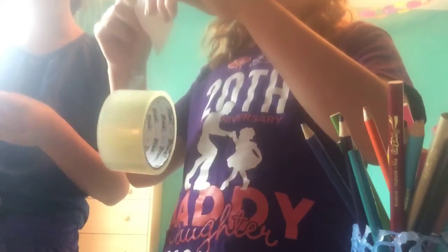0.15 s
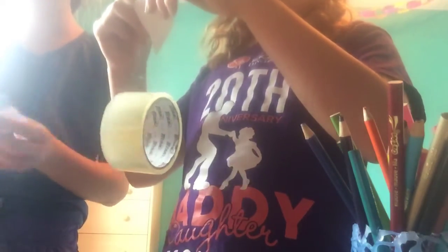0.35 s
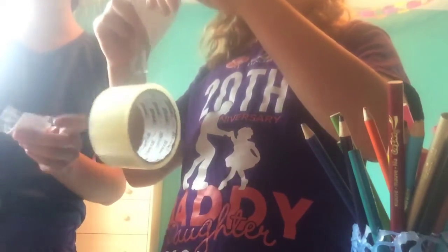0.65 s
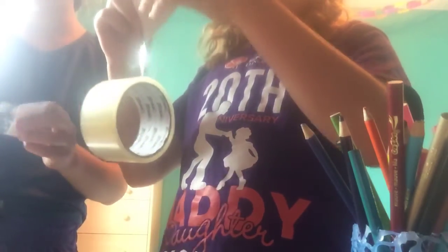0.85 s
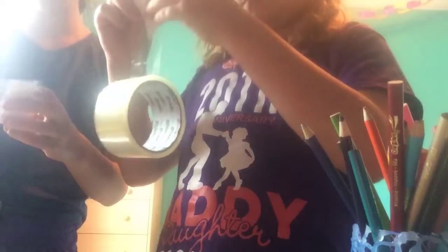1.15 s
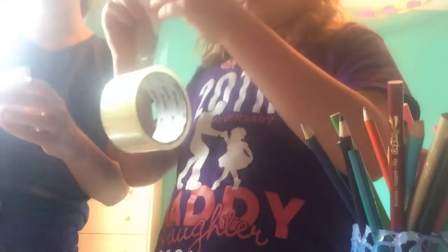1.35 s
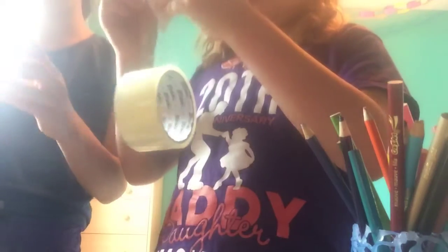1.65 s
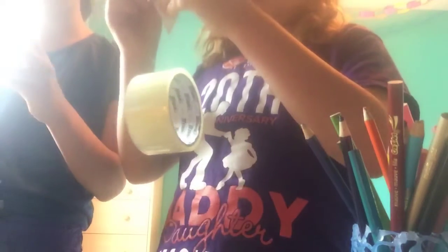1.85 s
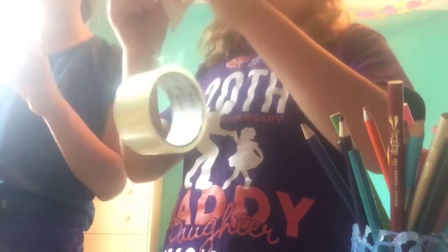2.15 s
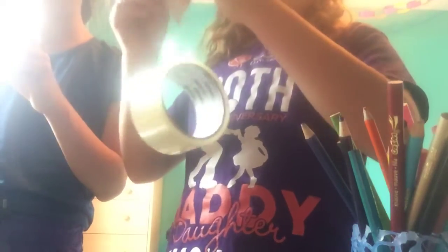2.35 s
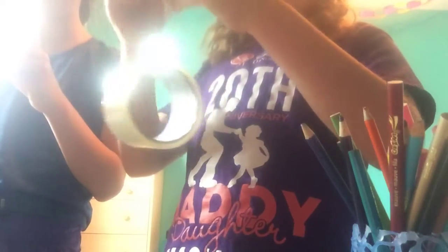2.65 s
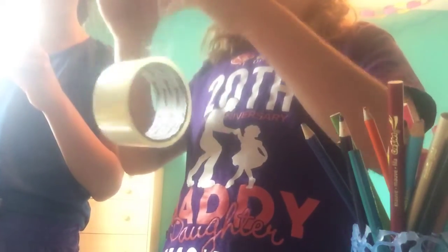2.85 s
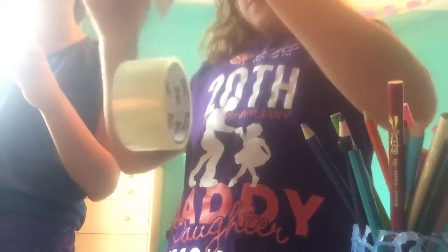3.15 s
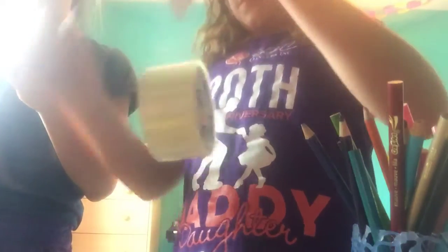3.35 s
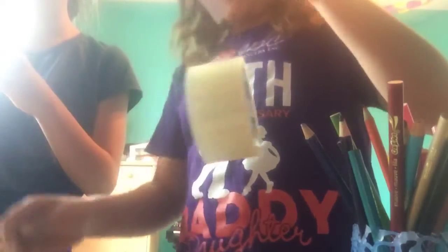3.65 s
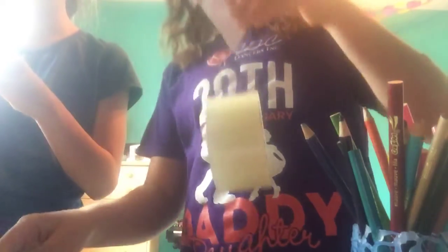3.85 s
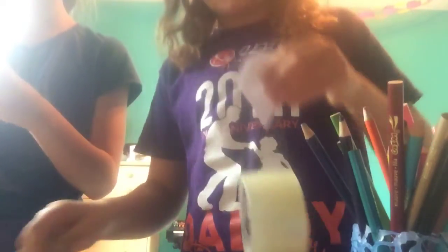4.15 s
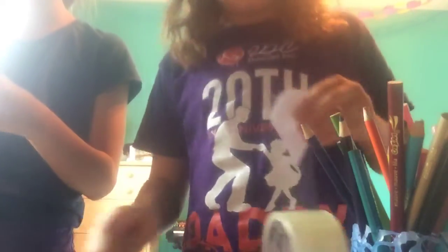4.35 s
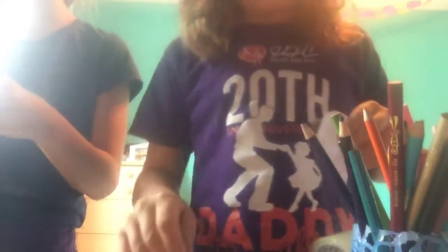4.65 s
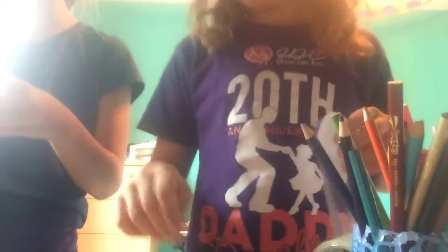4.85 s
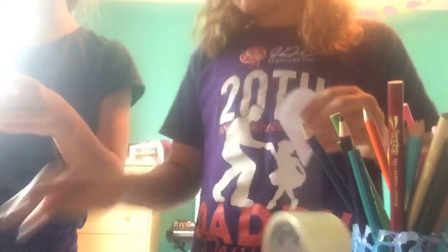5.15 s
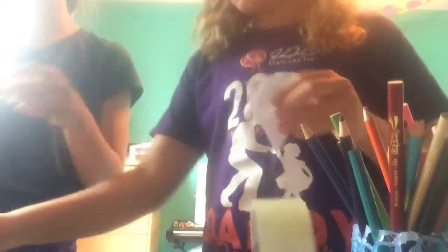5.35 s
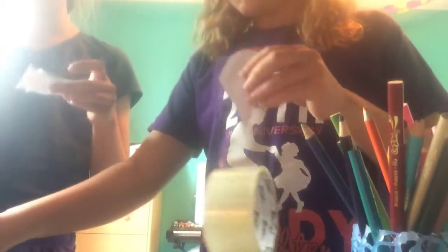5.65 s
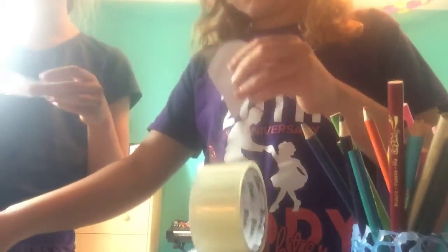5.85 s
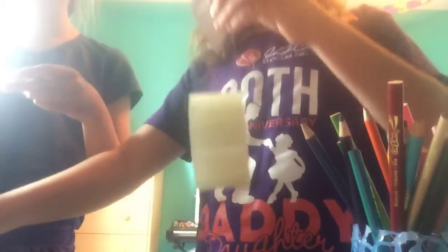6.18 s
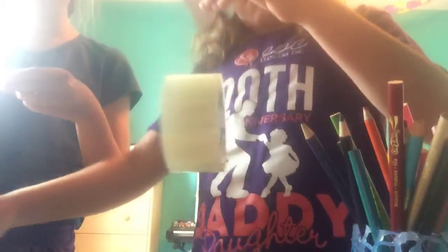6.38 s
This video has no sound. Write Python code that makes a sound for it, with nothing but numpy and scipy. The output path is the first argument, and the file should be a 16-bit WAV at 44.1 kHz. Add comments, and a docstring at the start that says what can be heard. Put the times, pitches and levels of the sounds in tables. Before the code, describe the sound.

Clear packing tape is tugged off its roll in two bouts of short crackling jerks, with rasping, brief squeaks and light finger ticks between.

```python
"""Packing tape, close up

A small room, one microphone close to a roll of clear packing tape tugged off in short jerks.
The glue holds, then lets go: each slip cracks, runs through the taut film and thumps the cardboard core.
Between slips the glue creeps with a rasp, a groan and brief squeaks.
Fingers tick and brush on the film; the room tone, with its low hum, lies underneath."""
import sys
import numpy as np
from scipy import signal
from scipy.fft import rfft, irfft
from scipy.io import wavfile
from scipy.ndimage import uniform_filter1d

SR = 44100
rng = np.random.default_rng(int(sys.argv[2]) if len(sys.argv) > 2 else 0)


def dump_mix(stems):
    """Bounce the given channels to the path in sys.argv[1] as a 16-bit WAV at rate SR."""
    frames = np.atleast_2d(stems).T  # one column per channel
    limited = np.clip(frames, -1, 1)  # hard clip at full scale
    pcm = np.round(limited * 32767).astype(np.int16)
    wavfile.write(sys.argv[1], SR, pcm)


N = 287532
TIME = np.arange(N) / SR
RING_TIME = np.arange(SR // 10) / SR  # time axis of one blow

# spectrum of the room tone: f/Hz, level/dB
ROOM_TONE = [(20, -37), (35, -21), (60, 0), (85, -4), (120, -3), (170, -10), (290, -13), (400, -21),
             (700, -27), (1400, -28), (2500, -37), (5000, -40.5), (13300, -42), (15500, -61)]
# broad colour of the tape: f/Hz, level/dB
TAPE_COLOUR = [(25, -27), (50, -10), (85, -4), (150, -1), (220, -5), (320, -3), (430, -13), (720, -10),
               (1200, -13), (2200, -18), (2600, -25), (4000, -24), (6100, -27), (7100, -41), (9300, -38),
               (11000, -42), (12800, -39.5), (15500, -58)]
# resonances of roll, film and the room around them: f/Hz, width/Hz, lift/dB
TAPE_RESONANCES = [(90, 18, 5), (150, 28, 6), (225, 24, 3), (283, 30, 4), (338, 18, 5), (450, 26, 6),
                   (563, 14, 10), (712, 26, 10), (845, 26, 4), (915, 26, 4), (1060, 28, 3), (1157, 40, 4),
                   (1228, 34, 4), (1390, 24, 6), (1541, 24, 9), (1760, 26, 6), (1848, 24, 5), (2000, 24, 6),
                   (2150, 34, 6), (2270, 34, 6), (2940, 90, 6), (3245, 70, 6), (3390, 50, 5), (3600, 70, 4),
                   (5950, 220, 2), (8400, 700, 5)]
# colour of the loose film: f/Hz, level/dB
FILM_COLOUR = [(300, -8), (1500, 2), (3000, -3), (4400, 3), (5200, 1), (6000, 4), (7200, -12), (9300, -3),
               (10800, -5), (12500, 0), (15500, -10)]
# film gliding over skin: t/s, half length/s, level/dB, treble/dB
FILM_GLIDES = [(2.35, .012, -63, -5), (2.425, .025, -69, -5), (3.1, .05, -77, 5), (3.24, .027, -70.5, 0),
               (3.46, .04, -71, -4), (3.985, .022, -72.5, 1), (4.115, .02, -73, 2), (5.345, .015, -68, -12)]
# film crinkling in the fingers: t/s, half length/s, level/dB, treble/dB
FILM_CRINKLES = [(.835, .012, -58, 12), (1.19, .04, -71, 5), (1.464, .008, -56, 7), (1.81, .014, -63, 6),
                 (4.208, .005, -66, -1)]
# skin sliding on film and roll: t/s, half length/s, centre f/Hz, width/centre, level/dB
SKIN_RUBS = [(1.195, .028, 2940, .45, -53), (1.19, .035, 1200, .12, -47), (1.09, .03, 1230, .03, -52),
             (1.485, .025, 1050, .7, -49), (1.522, .012, 1200, 1.2, -44), (1.6, .03, 1020, .3, -57),
             (2.355, .012, 680, .5, -65), (2.42, .025, 1650, .6, -66), (4.69, .025, 1750, .5, -58),
             (4.74, .05, 1600, .4, -66), (4.69, .05, 230, .5, -60), (5.345, .022, 1400, .4, -62),
             (5.42, .022, 1420, .35, -55), (5.5, .015, 1800, .6, -53), (5.59, .02, 1550, .5, -57),
             (6.045, .02, 1000, 2.5, -54), (6.128, .014, 1600, 2.5, -52)]
# light ticks of fingers and loose film: t/s, strength/dB, brightness/(dB per octave), ring f/Hz,
# relative length
FINGER_TICKS = [(.5104, -56, -5, 1310, 1), (.6584, -67, 3, 5490, 1), (.7337, -77, 11, 4630, 1),
                (2.2714, -59, 0, 3390, 1), (2.3426, -63, 4.5, 4620, 2), (2.3554, -60, 2.1, 1110, 1.5),
                (2.4154, -59, -.5, 1630, 2.5), (2.5476, -92, 14.5, 13300, 1), (2.5955, -81, 11.3, 12200, 1),
                (2.6544, -54, -1.6, 1250, 1.5), (2.7744, -52, -4.5, 1340, 1), (2.8799, -73, 6.5, 4280, 1),
                (3.3049, -61, -.5, 700, 1.8), (3.5204, -62, -5, 1280, 1.8), (3.8906, -70, 5.5, 3740, 2),
                (4.2188, -74, 12.6, 6030, 1.3), (4.3545, -67, 8.5, 12000, 1), (5.1936, -54, -2, 3100, 1.5),
                (5.2435, -58, -2.5, 2200, 1.8), (5.3224, -57, -1.6, 1530, 1.8)]
# pulls on the strip: start t/s, fully taut t/s, eased off t/s, creep level/dB
STRIP_PULLS = [(.78, .93, 1.44, -43.5), (5.09, 5.72, 6.52, -49)]
# bands that carry the creep: low f/Hz, high f/Hz, relative level/dB
CREEP_BANDS = [(70, 380, -1.3), (400, 1500, -14), (1500, 4000, -22.5)]
# rings of the taut strip: f/Hz, width/Hz, relative level/dB
STRIP_MODES = [(560, 24, -19), (708, 20, -13.5), (1232, 26, -22)]
# groan of the stretched strip: t/s, f/Hz, level before trim/dB
GROAN_CURVE = [(.776, 280, -50), (.794, 275, -32), (.812, 230, -42), (.835, 250, -53), (.856, 285, -32),
               (.875, 250, -40), (.93, 275, -39), (.985, 315, -40), (1.08, 280, -46), (1.14, 240, -55),
               (1.2, 280, -44), (1.3, 260, -50), (1.345, 255, -48), (1.36, 255, -37), (1.385, 250, -51),
               (1.472, 295, -50), (1.495, 283, -32), (1.515, 275, -32), (1.528, 275, -45), (1.6, 275, -62)]
# squeaks of the taut strip: t/s, length/s, starting f/Hz, level/dB
STRIP_SQUEAKS = [(.877, .018, 3740, -41), (1.0, .012, 3830, -34), (1.514, .02, 2400, -50),
                 (5.712, .016, 1480, -43), (5.951, .02, 1330, -54)]
# bounces of the roll at the hardest jerks: t/s, level/dB, decay/s
ROLL_BOUNCES = [(.885, -40, .02), (1.008, -37, .015), (1.538, -41, .016), (5.092, -35.5, .032),
                (5.459, -36.5, .03), (5.647, -31.5, .034), (5.762, -36.5, .032), (6.205, -39, .04),
                (6.425, -37.5, .015)]
# slips of the glue: t/s, strength/dB, brightness/(dB per octave), extra jolt to the core/dB,
# free strip's ring f/Hz, extra snap/dB, snap's ring f/Hz, relative length
GLUE_SLIPS = [(.7774, -56, -6, 14, 850, -3, 3300, 1.5), (.8264, -51, 4, -1, 1500, 2, 3100, 1.2),
              (.8454, -45, -.5, 6, 1210, 1, 3800, 1.2), (.8769, -51, .8, 15, 1400, 7, 3620, 1.3),
              (.8864, -40, -2, 9, 710, 0, 3050, 1.3), (1.0001, -47, 3.3, 11, 1850, 7, 3770, 1),
              (1.0084, -37, 1.2, 5, 1250, -1, 3050, 1), (1.0144, -30.5, -3.6, 4, 1170, -1, 5400, .7),
              (1.1704, -47.5, -2.5, 3, 1230, 0, 3200, 1.3), (1.2274, -49, -3.7, 7, 1060, 0, 3700, 1.1),
              (1.3264, -45.5, 0, -2, 720, 0, 3700, 1.2), (1.4564, -55, 2.4, 4, 1130, 0, 5900, 1.7),
              (1.5334, -35, -.6, 4, 1580, -1, 6000, 1), (1.538, -38, -10, 0, 1030, -3, 3300, 1.9),
              (1.552, -46, -6, 13, 1000, -3, 3300, 1.3), (5.0873, -41.5, 1.7, 9, 730, 1, 3300, 1.3),
              (5.4564, -34, -.3, 5, 720, 0, 3500, 1), (5.6425, -39.5, 3.3, 11, 850, 2, 6000, 1.4),
              (5.658, -49, -3, 12, 840, 0, 3300, 1.5), (5.7118, -42.5, -10, 6, 1000, 0, 3300, 1.8),
              (5.7372, -35.5, 0, -2, 1380, 0, 3450, 1.1), (5.7498, -38, 2.9, -6, 1540, 1, 5100, 1.1),
              (5.7574, -37.5, -1.5, 7, 715, -2, 3400, .9), (5.8802, -41.5, -.3, 2, 570, -1, 4000, 1.5),
              (5.9504, -56, -6, 11, 1200, 0, 3300, 1.6), (6.11, -56, -1.5, 13, 570, 0, 3900, 2.2),
              (6.1985, -39.5, 3.7, 6, 2170, 0, 5700, 1.3), (6.2084, -38, -1.5, 7, 1530, -3, 3300, 1),
              (6.2452, -41.5, 1.6, 6, 1280, 6, 3700, 1), (6.2554, -39.5, -3, 8, 710, -2, 3500, 1.1),
              (6.2844, -42.5, -3.5, 5, 1550, 0, 3300, 1.1), (6.3504, -55, -4, 14, 740, -2, 3100, 2.2),
              (6.4232, -42.5, 2.6, 12, 800, 5, 5050, 1.1)]
# the parts that a slip shakes: low f/Hz, high f/Hz, arrival/s, rise/s, decay/s, room level/dB,
# share of the blow/dB
CORE_THUMP = (100, 400, .0003, .0015, .012, -11, -1.5)
ROLL_KNOCK = (385, 1250, .0003, .0014, .0058, -13, -.3)
FILM_FLAP = (1250, 3000, .0002, .001, .0072, -13, -4.1)
FILM_SNAP = (3000, 6500, .0002, .0006, .0064, -15.5, -9)
FILM_CRACK = (6800, 15500, .0001, .0001, .0026, -16, -23.6)


def undb(db):
    """Decibels to gain."""
    return 10 ** (np.asarray(db) / 20)


def unit(x):
    """Scale to rms 1."""
    return x / np.sqrt(np.mean(x ** 2) + 1e-30)


def band(x, lo_hz, hi_hz, order=4):
    """Causal band-pass along the last axis."""
    edges = np.clip([lo_hz, hi_hz], 15, SR * .48)
    return signal.sosfilt(signal.butter(order, edges, "band", fs=SR, output="sos"), x)


def convolve(x, response):
    """Pass each row of x through an impulse response, keeping its length."""
    return signal.oaconvolve(x, response if x.ndim == 1 else response[None], axes=-1)[..., :x.shape[-1]]


def resonate(x, hz, width_hz):
    """One resonance, gain 1 at its centre."""
    return signal.lfilter(*signal.iirpeak(hz, hz / width_hz, fs=SR), x)


def colour(x, points, size=4096):
    """Causal filter through (f/Hz, level/dB) points, by way of the cepstrum."""
    hz, db = np.transpose(points)
    bins_hz = np.arange(size // 2 + 1) * SR / size
    gain = undb(np.interp(np.log(bins_hz + 1), np.log(hz), db))
    cepstrum = irfft(np.log(gain))
    cepstrum[1:size // 2] *= 2
    cepstrum[size // 2 + 1:] = 0
    return convolve(x, irfft(np.exp(rfft(cepstrum))))


def walk(rate_hz):
    """Smooth random wander with rms 1."""
    hold = int(SR / rate_hz)
    steps = np.repeat(rng.standard_normal(N // hold + 1), hold)
    return unit(uniform_filter1d(steps, hold)[:N])


def grains(shape, per_s, spread_db):
    """Sparse clicks of very unequal size."""
    fired = rng.random(shape) < per_s / SR
    polarity, size = rng.standard_normal((np.count_nonzero(fired), 2)).T
    clicks = np.zeros(shape)
    clicks[fired] = np.sign(polarity) * undb(spread_db * size)
    return clicks


def swell(x, s, half_s, db):
    """Bring a sound in and out smoothly around one moment."""
    shape = np.exp(-.5 * ((TIME - s) / half_s) ** 2)
    return undb(db) * shape * x / np.sqrt(np.average(x ** 2, weights=shape ** 2))


def room_tone(air_db=-63.5, hum_db=-63.5, hum_hz=117.7):
    """The still room: low rumble, faint hiss and a wavering hum."""
    air = unit(colour(rng.standard_normal(N), ROOM_TONE)) * undb(air_db + .7 * walk(6))
    phase = 2 * np.pi * np.cumsum(hum_hz * (1 + .009 * walk(14))) / SR
    waver = undb(2.2 * walk(9) + 1.2 * walk(2))
    return air + undb(hum_db) * unit(np.sin(phase) * waver)


def room(x, wet_db, t60_s=.24, treble_t60_s=.2, treble_hz=1800):
    """Near walls answer within milliseconds; their sound dies quickly, the treble first."""
    t = np.arange(SR // 3) / SR
    echoes = rng.standard_normal(len(t)) * (1 - np.exp(-t / .006))
    low = signal.sosfiltfilt(signal.butter(2, treble_hz, fs=SR, output="sos"), echoes)
    tail = low * undb(-60 * t / t60_s) + (echoes - low) * undb(-60 * t / treble_t60_s)
    return x + undb(wet_db) * convolve(x, tail / np.linalg.norm(tail))


def tape_response():
    """One sharp tug as it reaches the microphone: the tape's broad colour and ringing resonances."""
    tug = signal.unit_impulse(len(RING_TIME))
    ringing = sum((undb(db) - 1) * resonate(tug, hz, width) for hz, width, db in TAPE_RESONANCES)
    return colour(tug + ringing, TAPE_COLOUR)


def film_swells(sound, rows, treble_hz=7000):
    """Swells of sound coloured by the loose film, some brighter than others."""
    film = colour(sound, FILM_COLOUR)
    low, high = band(film, 200, treble_hz), band(film, treble_hz, 17000)
    return sum(swell(low + undb(treble_db) * high, s, half, db) for s, half, db, treble_db in rows)


def glides(echo_s=.00068, echo_db=-3):
    """Film slides softly over skin; the hand reflects the sound, shifting its colour as it moves."""
    friction = grains(N, per_s=4000, spread_db=3) * undb(2.5 * walk(45))
    delay_s = echo_s * (1 + .14 * walk(9))
    reflection = np.interp(TIME - delay_s, TIME, friction)
    return film_swells(friction + undb(echo_db) * reflection, FILM_GLIDES)


def crinkles():
    """Creases pop in the loose film in short, uneven flurries."""
    pops = grains(N, per_s=650, spread_db=5) * undb(4 * walk(70))
    return film_swells(room(pops, wet_db=-4), FILM_CRINKLES)


def rubs(body_db=-14):
    """Skin rubs in soft swells of clicks around one pitch; a little runs through the whole roll."""
    friction = grains(N, per_s=1500, spread_db=5) * undb(3 * walk(55))
    through_roll = convolve(room(friction, wet_db=-3), tape_response())
    body = undb(body_db) * unit(band(through_roll, 150, 6500, order=2))
    out = 0
    for s, half, hz, width, db in SKIN_RUBS:
        edge = np.sqrt(1 + width)
        rub = unit(band(through_roll, hz / edge, hz * edge, order=2))
        out += swell(rub + body, s, half, db)
    return out


def shake(blows, part, ring_db=0, ring_width=.16, lead_s=.015, tilt_from_hz=600):
    """One part of the tape answers each blow with a dying volley of clicks, heard in the room."""
    times, strength_db, brightness, rings_hz, length = blows
    lo_hz, hi_hz, arrival, rise, decay, room_db, share_db = part
    levels_db = strength_db + share_db + brightness * np.log2(max(lo_hz / tilt_from_hz, 1))
    age = np.maximum(RING_TIME - lead_s - arrival, 0) / length[:, None]  # low bending waves arrive late
    force = (1 - np.exp(-age / rise)) * np.exp(-age / decay)
    force /= force.max(axis=1, keepdims=True)
    # a faint swell leads into each blow
    force += undb(-20) * np.exp(-np.abs(RING_TIME - lead_s) / .005)
    clumps = undb(3 * np.resize(walk(500), force.shape))
    volleys = grains(force.shape, per_s=6000, spread_db=3) * clumps * force
    for volley, hz in zip(volleys, rings_hz):
        volley += undb(ring_db) * resonate(volley, hz, hz * ring_width)
    sounds = convolve(volleys, band(tape_response(), lo_hz, hi_hz))
    peak_rms = np.sqrt(uniform_filter1d(sounds ** 2, int(.018 * SR), axis=1).max(axis=1))
    out = np.zeros(N + len(RING_TIME))
    for s, gain, sound in zip(times, undb(levels_db) / peak_rms, sounds):
        start = int((s - lead_s) * SR)
        out[start:start + len(sound)] += gain * sound
    return room(out[:N], room_db)


def ticks():
    """Light touches move the film, each with its own ring, and hardly stir the roll."""
    touches = np.transpose(FINGER_TICKS)
    low_flap = (1000, 2300, *FILM_FLAP[2:])  # band edges in Hz
    parts_db = [(ROLL_KNOCK, -11), (low_flap, .5), (FILM_SNAP, -5.5), (FILM_CRACK, 0)]
    return sum(undb(db) * shake(touches, part, ring_db=4, ring_width=.13) for part, db in parts_db)


def tension(slack_db=-16, release_db_per_s=90):
    """Gain of the creep: each pull tightens, holds and eases off."""
    out = 0
    for start, taut, eased, db in STRIP_PULLS:
        rise_db = np.interp(TIME, [start, taut], [slack_db, 0])
        fall_db = release_db_per_s * np.maximum(TIME - eased, 0)
        out += (TIME > start) * undb(db + rise_db - fall_db)
    return out


def creep(ring_onset_db=-41):
    """Slow peeling: an uneven stream of snapping glue threads heard through core, roll and film."""
    snaps = grains(N, per_s=2000, spread_db=4.3) * undb(3.5 * walk(40))
    threads = convolve(snaps, tape_response())
    rasp = sum(undb(db) * unit(band(threads, lo, hi, order=2)) for lo, hi, db in CREEP_BANDS)
    rings = sum(undb(db) * unit(resonate(threads, hz, width)) for hz, width, db in STRIP_MODES)
    pull = tension()
    ring_gain = np.minimum(pull / undb(ring_onset_db), 1)  # the rings fade twice as fast as the rasp
    return pull * (rasp + rings * ring_gain)


def growl(rate_hz=82):
    """At its slowest the peeling breaks into separate jolts that rattle the core."""
    cycles = np.floor(np.cumsum(rate_hz * (1 + .12 * walk(80))) / SR)
    jolts = convolve(np.diff(cycles, prepend=0), tape_response())
    return swell(band(jolts, 60, 380), s=1.408, half_s=.026, db=-43.5)


def groan(drift=.015, jitter=.11, overtone_db=-22, trim_db=-1):
    """The peel line sticks and slips almost regularly: a wavering low note that comes in spurts."""
    s, hz, db = np.transpose(GROAN_CURVE)
    pitch_hz = np.interp(TIME, s, hz) * (1 + drift * walk(14) + jitter * walk(160))
    phase = 2 * np.pi * np.cumsum(pitch_hz) / SR
    note = np.sin(phase) + undb(overtone_db) * np.sin(2 * phase)
    spurts = np.interp(TIME, s, undb(db + trim_db), left=0, right=0)
    return unit(note * undb(2.6 * walk(90))) * spurts


def squeaks(fall_per_s=3, jitter=.03):
    """The peel line chatters for an instant: a bright chirp that falls as the strip slackens."""
    out = 0
    for s, length, hz, db in STRIP_SQUEAKS:
        age = np.clip(TIME - s, 0, length)
        pitch_hz = hz * (1 - fall_per_s * age + jitter * walk(1500))
        phase = 2 * np.pi * np.cumsum(pitch_hz) / SR
        shape = np.sin(np.pi * np.sqrt(age / length))
        out += undb(db) * np.sqrt(2) * shape * np.sin(phase)
    return out


def bounces(thud_hz=88, rise_s=.008, jitter=.12):
    """The roll bounces on the taut strip: a deep thud that soon dies."""
    pitch_hz = thud_hz * (1 + jitter * walk(90))
    out = 0
    for s, db, decay in ROLL_BOUNCES:
        age = np.maximum(TIME - s, 0)
        shape = (1 - np.exp(-age / rise_s)) * np.exp(-age / decay)
        phase = 2 * np.pi * np.cumsum(pitch_hz * (age > 0)) / SR
        out += undb(db) * np.sqrt(2) * shape / shape.max() * np.sin(phase)
    return out


def slips(core_hz=315, ring_lift_db=5):
    """Close to the microphone the glue lets go and shakes everything from the film to the core."""
    s, strength, brightness, jolt_db, strip_hz, snap_db, snap_hz, length = np.transpose(GLUE_SLIPS)

    def strip_blows(part):
        """Length and tension set the free strip's ring; the part whose band holds it sounds louder."""
        in_band = (strip_hz >= part[0]) & (strip_hz < part[1])
        return s, strength + ring_lift_db * in_band, brightness, strip_hz, length

    alike = np.ones(len(s))
    core_blows = (s, strength + jolt_db, brightness, core_hz * alike, alike)
    snap_blows = (s, strength + snap_db, brightness, snap_hz, length)
    thump = shake(core_blows, CORE_THUMP, ring_db=-9, ring_width=.28)
    knock = shake(strip_blows(ROLL_KNOCK), ROLL_KNOCK, ring_db=3, ring_width=.14)
    flap = shake(strip_blows(FILM_FLAP), FILM_FLAP, ring_db=3, ring_width=.07)
    snap = shake(snap_blows, FILM_SNAP, ring_db=4, ring_width=.11)
    crack = shake(strip_blows(FILM_CRACK), FILM_CRACK)
    return thump + knock + flap + snap + crack


def scene():
    """Tape and fingers at one close microphone, with the room tone behind."""
    peeling = slips() + bounces() + creep() + groan() + growl() + squeaks()
    handling = ticks() + rubs() + crinkles() + glides()
    return (peeling + handling + room_tone())[None]


def record(dry):
    """The recorder cuts the treble above 15.6 kHz."""
    return signal.sosfilt(signal.ellip(8, .2, 70, 15600, fs=SR, output="sos"), dry)


dry = scene()
out = record(dry)
dump_mix(out)
```